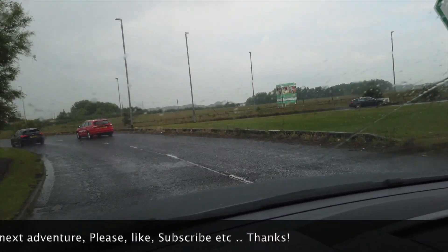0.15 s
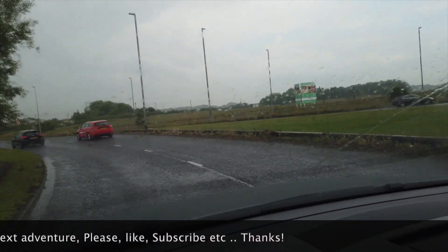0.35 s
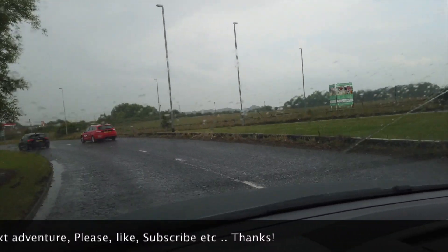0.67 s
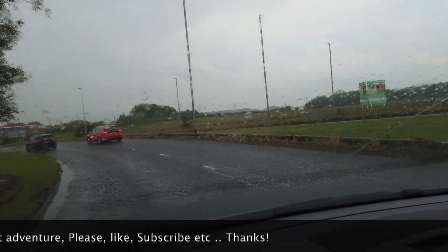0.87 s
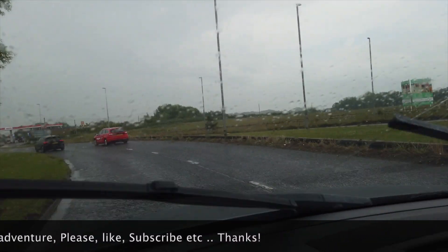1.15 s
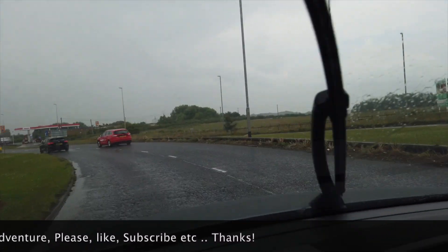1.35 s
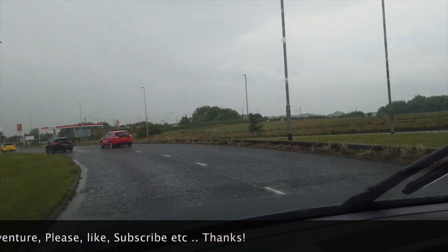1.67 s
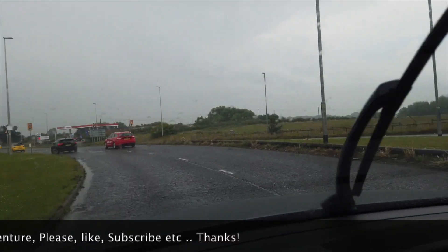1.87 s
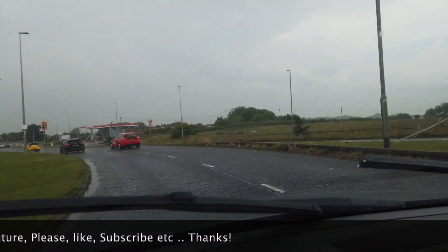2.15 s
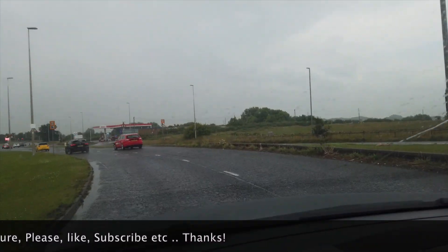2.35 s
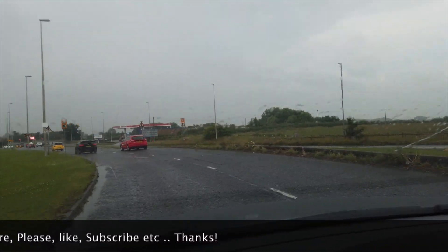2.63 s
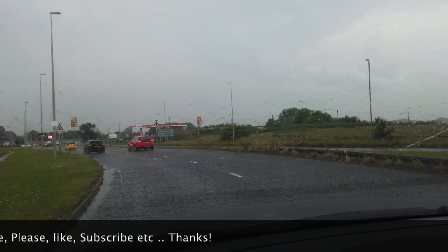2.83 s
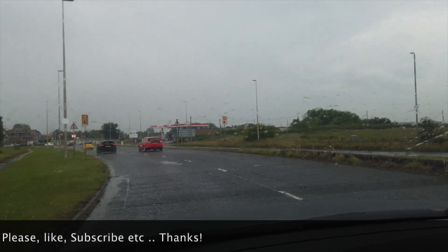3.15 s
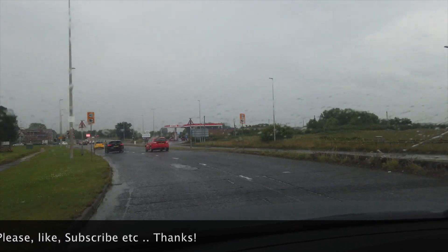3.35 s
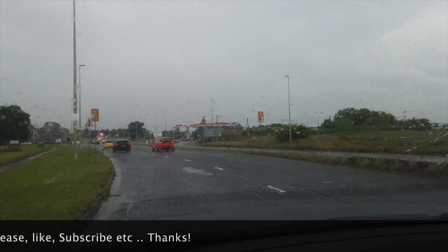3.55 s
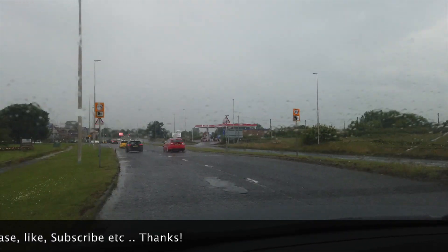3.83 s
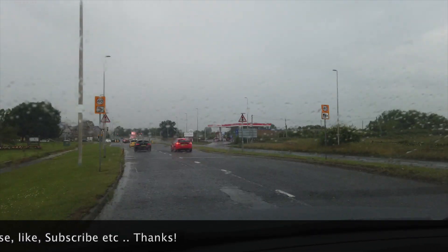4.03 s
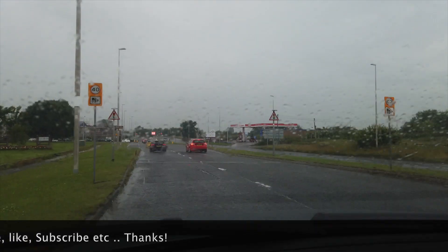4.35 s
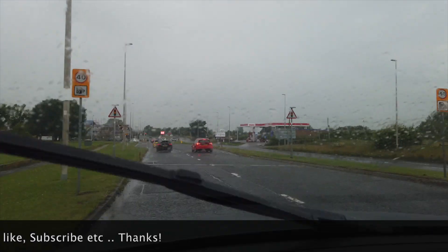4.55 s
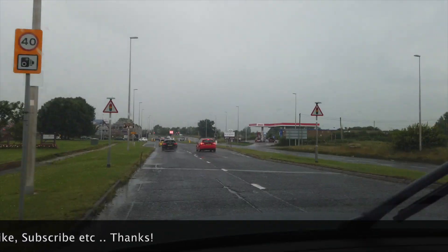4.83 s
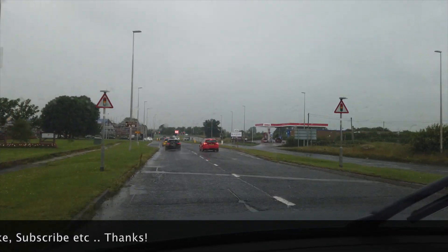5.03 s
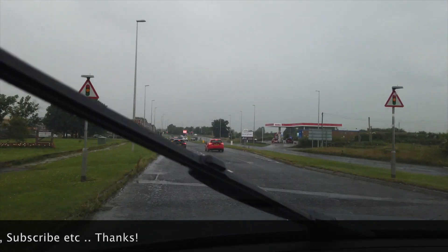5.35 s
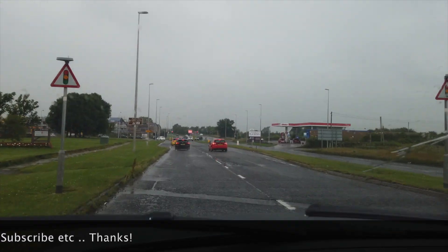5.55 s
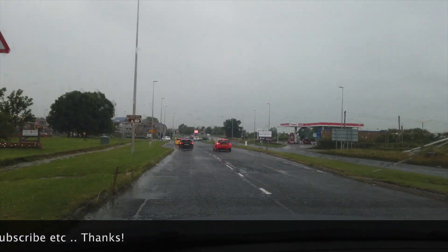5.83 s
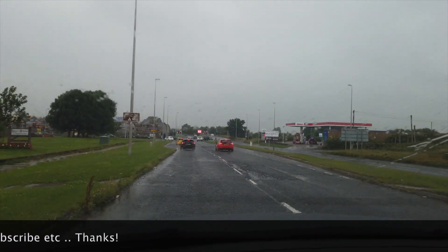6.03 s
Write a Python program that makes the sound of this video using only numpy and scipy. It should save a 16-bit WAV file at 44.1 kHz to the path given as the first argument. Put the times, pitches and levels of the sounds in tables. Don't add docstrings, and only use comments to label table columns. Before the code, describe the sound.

A close, boxy car interior dominated by low-frequency boom and floor drone, calmer at first, then rougher after two seconds with quick thumping jolts. Two wiper sweeps stand out, each a short scrape followed by a low stick-slip rubber hum on the glass and a dull stop. Small trim clicks, squeaks and rattles scatter around the bumps; muted wet hiss and barely audible very high electronic blips continue throughout, picked up by a dashboard microphone.

```python
import sys
import numpy as np
from scipy import signal
from scipy.fft import rfft, irfft, next_fast_len
from scipy.io import wavfile
from scipy.ndimage import uniform_filter1d

SR = 44100
rng = np.random.default_rng(int(sys.argv[2]) if len(sys.argv) > 2 else 0)


def rack_gain(trim_db):
    fader = np.asarray(trim_db, float)
    return 10 ** (fader / 20)


def int16_out(signal):
    q = np.round(np.clip(np.atleast_2d(signal).T, -1, 1) * 32767)
    wavfile.write(sys.argv[1], SR, q.astype(np.int16))


N = 272979
FFT = next_fast_len(N)

# pitch_hz, level_db (per Hz)
BOOM_COLOUR = [(5.9, -41), (10, -13.5), (38, 3.5), (51, 0), (61, -11), (75, -21), (98, -32.5), (160, -120)]
# pitch_hz, level_db (per Hz)
DRONE_COLOUR = [(35, -18.5), (60, -7), (75, -8), (111, -3.5), (134, -16.5), (162, -22), (187, -22.5),
                (215, -49), (240, -39.5), (310, -64), (530, -120)]
# start_s, level_db
ROAD_COARSENESS = [(0, -16.5), (.7, -29.5), (1.5, -28), (1.9, -17), (2.5, -22), (3.1, -22.5), (3.8, -20.5),
                   (4.3, -21.5), (4.75, -27), (5.3, -25), (5.8, -21.5), (6.19, -16.5)]
# start_s (peak), level_db, half_length_s
BUMPS = [(.08, -42, 0.046), (.23, -41, 0.015), (.45, -23.5, 0.18), (.65, -16.5, 0.036), (.86, -20.5, 0.12),
         (1.04, -14, 0.032), (1.29, -9.5, 0.022), (1.4, -19, 0.069), (2, -5.5, 0.0051), (2.1, -11.5, 0.01),
         (2.17, -8.5, 0.018), (2.28, -9, 0.058), (2.41, -14.5, 0.053), (2.52, -11.5, 0.04),
         (2.73, -12.5, 0.018), (2.81, -14.5, 0.031), (2.95, -6.5, 0.023), (3.03, -12.5, 0.045),
         (3.25, -14.5, 0.02), (3.5, -25, 0.017), (4.11, -8.5, 0.047), (4.41, -9, 0.066), (4.65, -21, 0.034),
         (4.95, -21.5, 0.11), (5.14, -19.5, 0.058), (5.51, -18, 0.12), (5.89, -8.5, 0.037),
         (6.02, -10, 0.026), (6.11, -3.5, 0.017)]
# start_s (peak), level_db, half_length_s
ROAD_SEAMS = [(.15, -35.5, 0.013), (.33, -46, 0.014), (.49, -25.5, 0.022), (.74, -25, 0.05),
              (1.13, -20.5, 0.18), (1.6, -22.5, 0.14), (1.84, -21, 0.08), (2, -23.5, 0.059),
              (2.21, -26, 0.055), (2.33, -20, 0.047), (2.47, -26.5, 0.2), (2.68, -26.5, 0.096),
              (2.79, -22.5, 0.04), (3.06, -25, 0.12), (3.25, -33.5, 0.034), (3.45, -29.5, 0.034),
              (3.62, -22.5, 0.024), (3.71, -23, 0.024), (3.85, -32, 0.15), (4.14, -22.5, 0.083),
              (4.28, -21, 0.039), (4.4, -22.5, 0.082), (4.57, -21, 0.025), (4.64, -21, 0.042),
              (4.81, -23, 0.022), (4.99, -23, 0.066), (5.14, -26, 0.026), (5.47, -26, 0.096),
              (5.68, -24.5, 0.034), (5.85, -26, 0.041)]
DRONE_DB, DRONE_FOLLOWS = -30, 0.39

# pitch_hz, level_db (per Hz)
SCRAPE_COLOUR = [(71, -39), (120, -2.5), (195, -6), (267, -17.5), (417, -17), (562, -32), (767, -28),
                 (1150, -38), (2330, -54), (4000, -53.5), (6200, -70), (8000, -73)]
# pitch_hz, width_hz, level_db
ARM_RINGS = [(1940, 810, -7), (3270, 1200, -2.5), (4570, 600, 0), (6100, 660, 9.5)]
# start_s (tear), scrape_db, grit_db, creep_lead_s, creep_db, drag_after_db
LIFT_OFFS = [
    (1.08, -23, -27, 0.029, -29.5, -41.5),
    (4.442, -31.5, -17, 0.048, -32, -46.5),
]
TEAR_S, AFTER_S = 0.028, 0.11

# pitch_hz, width_hz, level_db
GLASS_RINGS = [(453, 30, 3.5), (615, 50, -0.5), (792, 69, -0.5), (936, 18, -9), (1350, 310, -12.5),
               (1800, 200, -23.5)]
# pitch_hz, level_db (per Hz)
RUBBER_COLOUR = [(140, -34), (230, -6.5), (301, -3), (440, -4), (518, -16.5), (615, -1), (781, -12),
                 (1050, -9), (1350, -14.5), (1800, -20.5), (2300, -42.5), (2900, -29.5), (6000, -53),
                 (11000, -62)]
# start_s, slip_rate_hz, judder_db, octave_db, bite_db
RETURN_STROKES = [
    [(1.3, 173.1, -30, -54, 0.5), (1.364, 177.6, -42, -45.5, -6), (1.42, 202.9, -23, -44, -5.5),
     (1.455, 185.5, -39.5, -30, -3), (1.498, 158, -17.5, -42, -1), (1.55, 149, -31.5, -48, -2.5),
     (1.616, 143.8, -17.5, -37, 0.5), (1.665, 158.3, -23, -41.5, -6.5), (1.73, 158.6, -43.5, -54, -3)],
    [(4.72, 198, -42.5, -59.5, -5), (4.765, 200.1, -32.5, -42, -5), (4.806, 192, -41, -35.5, 0.5),
     (4.85, 163, -19, -45, 0), (4.885, 157.8, -23, -43.5, -2), (4.935, 154.7, -34.5, -42, -1.5),
     (4.975, 148.1, -25, -51, -1), (5.05, 173, -32, -43, -4), (5.1, 171.7, -46, -60, 1)],
]
# start_s (full pressure), held_s, level_db, gritty_top_db, hiss_lift_db
STROKE_RUBS = [
    (1.472, 0.21, -44, -32, 2.5),
    (4.851, 0.19, -48, -16, 4.5),
]
RUB_RISE_DB_S, RUB_FALL_DB_S = 60.5, 294.5
RUB_BRIGHTENS = 2.5
RUB_FOLLOWS = .12

# start_s, level_db, low_thud_db, t60_s
DULL_KNOCKS = [(1.071, -41, -19, 0.17), (1.406, -47, -15.5, 0.065), (1.821, -50, -11.5, 0.074),
               (2.778, -59, -38.5, 0.083), (3.188, -49, -49, 0.12), (4.428, -38.5, -37, 0.12),
               (5.168, -44, -19.5, 0.082), (5.836, -54, -28, 0.15), (6.005, -58, -10.5, 0.034)]
# pitch_hz, level_db
PANEL_MODES = [(155, 0), (330, -4.5), (450, 0.5), (800, 0.5), (1150, -8.5), (1500, -2.5), (2050, -12)]
# start_s, level_db, middle_db, bright_db, length_s
TRIM_RATTLES = [(1.077, -45, -12, -15.5, 0.01), (1.487, -60, -15, -17, 0.05), (1.872, -59, -37, -28, 0.011),
                (2.084, -52, 1.5, -32.5, 0.02), (2.11, -40.5, -30.5, -27, 0.015),
                (2.153, -48.5, -16, -25.5, 0.021), (2.48, -51.5, -16.5, -24, 0.015),
                (3.034, -48.5, -18.5, -34, 0.026), (3.1, -47.5, -9.5, -23, 0.018),
                (3.175, -52, -20, -28, 0.061), (3.453, -51, -30, -14, 0.022),
                (3.486, -55.5, -25.5, -28, 0.017), (4.1115, -41, -6.5, -16, 0.028),
                (4.142, -56, -26.5, -23, 0.028), (4.203, -48, -28.5, -17, 0.014),
                (4.333, -47.5, -2, -16, 0.034), (4.51, -64, -13, -29, 0.017), (4.613, -70, -10, -23, 0.017),
                (4.933, -48.5, -13, -16, 0.045), (5.611, -45, -4, -23.5, 0.02),
                (5.64, -47, -17, -27, 0.017), (5.681, -58, -26, -16, 0.012), (6.062, -55, -22, -20, 0.044),
                (6.11, -61, -17, -17.5, 0.017)]
# pitch_hz, width_hz, level_db
TRIM_RINGS = [
    [(1550, 400, -5), (2000, 300, -1), (2640, 350, -5), (2000, 1400, -6)],
    [(2930, 200, -4), (3300, 350, -2), (4100, 250, 2), (3600, 800, -9)],
    [(5700, 400, 0), (6700, 400, -3), (8800, 600, -9), (10600, 600, -4)],
]

# start_s, length_s, pitch_hz, width_hz, level_db
THIN_SQUEAKS = [(.925, .013, 4930, 60, -71), (1.068, .022, 5900, 600, -72), (4.05, .04, 5620, 80, -77),
                (.925, .015, 2450, 300, -69), (3.046, .014, 4100, 90, -67), (3.478, .02, 2050, 100, -59),
                (1.872, .018, 2680, 90, -61), (3.375, .02, 2150, 300, -69), (1.872, .018, 2050, 80, -55),
                (3.04, .025, 10500, 800, -72), (4.263, .012, 5450, 300, -71), (4.278, .03, 5750, 500, -74),
                (4.84, .04, 4150, 400, -76), (4.3, .09, 10000, 200, -84), (4.88, .14, 9950, 300, -83),
                (5.095, .03, 6950, 400, -76), (5.11, .05, 10200, 300, -79), (5.15, .12, 10800, 600, -83),
                (5.618, .01, 6850, 300, -73)]
# start_s, length_s, pitch_hz, width_hz, level_db
JOINT_TICKS = [(1.05, .008, 900, 300, -52.5), (1.07, 0.0066, 4800, 900, -63),
               (1.073, 0.0122, 794, 500, -43.5), (1.076, 0.0071, 2960, 401, -58.5),
               (1.066, 0.036, 1980, 400, -55.5), (1.09, 0.0091, 1494, 597, -51),
               (1.488, 0.0069, 2170, 250, -60), (1.658, 0.019, 1800, 200, -54),
               (2.78, 0.0032, 900, 700, -55.5), (3.452, 0.034, 2410, 500, -66.5),
               (4.3, .008, 5580, 905, -62), (4.342, 0.0152, 1900, 700, -57.5),
               (4.366, 0.011, 1890, 400, -59), (4.387, 0.014, 2200, 1200, -61.5),
               (4.383, 0.035, 690, 300, -50), (4.426, .026, 1500, 700, -56),
               (4.436, 0.011, 2800, 1202, -61), (4.513, 0.0069, 2800, 900, -64),
               (4.912, 0.013, 2150, 250, -58), (5.835, 0.036, 698, 450, -52), (5.84, 0.014, 1110, 298, -54),
               (6.051, 0.011, 1690, 400, -55.5), (6.062, 0.03, 1900, 1006, -58.5),
               (6.066, .025, 2400, 601, -69)]
# start_s, length_s, pitch_hz, width_hz, level_db
LOW_GROANS = [(1.035, 0.018, 400, 200, -47.5), (1.065, 0.027, 410, 150, -44), (1.095, 0.012, 380, 249, -41),
              (1.335, 0.041, 700, 257, -58), (1.403, .035, 606, 120, -41.5), (1.42, 0.14, 1350, 250, -58),
              (1.6, 0.085, 370, 160, -43.5), (1.6, 0.07, 697, 350, -49), (1.6, .08, 1140, 884, -52.5),
              (1.812, 0.022, 340, 201.4, -41), (4.1, .1, 302, 151, -49.5), (4.44, 0.024, 348, 249, -42),
              (4.75, .05, 616, 100, -52), (4.83, 0.043, 782, 60, -49.5), (4.9, .05, 615, 79.3, -49),
              (5.16, 0.024, 320, 150, -45), (6.0, .12, 394, 302, -53), (6.06, 0.088, 1294, 890, -62)]
# start_s, length_s, pitch_hz, width_hz, level_db
CLIP_PINGS = [(1.072, 0.0041, 5900, 500, -63), (1.083, 0.0093, 6100, 500, -73),
              (1.4, 0.011, 2760, 247, -80), (1.47, .11, 4500, 900, -74), (1.487, .03, 5800, 450, -74.5),
              (1.495, 0.019, 4100, 150, -68), (1.53, .03, 6500, 300, -80), (1.62, 0.076, 2850, 300, -77.5),
              (1.813, .01, 2890, 300, -66), (1.815, 0.0099, 1620, 800, -60.5),
              (2.093, .012, 3200, 201, -63), (2.113, .015, 4060, 250, -69),
              (3.047, 0.011, 1950, 250, -58.5), (3.047, 0.013, 2600, 250, -62),
              (3.108, 0.0091, 1950, 250, -62), (3.19, .018, 800, 500, -57), (3.19, 0.014, 1460, 600, -56),
              (3.28, 0.032, 840, 120, -59.5), (4.328, .007, 3900, 400, -64.5),
              (4.315, .045, 5700, 300, -71), (4.825, .04, 3100, 900, -71), (4.943, .012, 3000, 1400, -61),
              (4.96, 0.055, 2800, 900, -70), (5.165, .01, 2800, 1500, -69), (5.645, .012, 3700, 700, -71),
              (5.6, .04, 6900, 700, -79), (5.77, 0.028, 2800, 1500, -70), (5.905, .02, 2880, 1200, -70)]

# pitch_hz, level_db (per Hz)
HISS_COLOUR = [(82, -29), (140, -5), (191, -9.5), (234, -19.5), (296, -20), (447, -27.5), (556, -34),
               (851, -30.5), (1020, -38.5), (2100, -43), (4000, -55), (6300, -61), (9000, -83.5)]
# start_s, level_db, wet_treble_db
SPRAY_LEVEL = [(0, -54, -3.5), (.9, -55, 1.5), (1.9, -49.5, -4.5), (2.7, -52.5, -2.5), (3.9, -52, -2),
               (5.36, -53.5, -0.5), (6.19, -49.5, -6.5)]
# pitch_hz, level_db (per Hz)
FINE_MIST_COLOUR = [(4500, -8.5), (7000, -3.5), (9200, -5), (10600, -1.5), (11500, -7.5), (13000, -12),
                    (14000, -7), (14600, -17), (15600, -19)]
MIST_DB = -82
# start_s (peak), level_db, half_length_s
MIST_PUFFS = [(3.64, -81, 0.28), (4.29, -76, 0.098), (4.75, -82.5, 0.098), (5.05, -74.5, 0.28),
              (5.23, -80.5, 0.05)]
# delay_s, gain
CABIN_ECHOES = [(.0071, .12), (.0094, -.12), (.0133, .14), (.0164, -.13), (.0187, .12), (.0229, .1)]

# start_s (peak), level_db, half_length_s
CAMERA_BLIPS = [(0.108, -79, 0.004), (0.201, -83, 0.009), (0.274, -75.5, 0.005), (0.37, -72, 0.01),
                (0.474, -79, 0.006), (0.576, -76, 0.006), (0.644, -75, 0.003), (0.735, -73, 0.007),
                (0.809, -78, 0.006), (0.876, -68, 0.003), (0.965, -75, 0.005), (1.045, -74, 0.007),
                (1.135, -75, 0.01), (1.305, -82, 0.006), (1.41, -71, 0.003), (1.665, -81, 0.006),
                (1.739, -73.5, 0.004), (1.812, -76, 0.006), (1.912, -75.5, 0.004), (1.965, -83, 0.005),
                (2.075, -71.5, 0.005), (2.144, -71, 0.004), (2.239, -76.5, 0.01), (2.311, -69, 0.003),
                (2.411, -77, 0.004), (2.504, -73.5, 0.008), (2.566, -77.5, 0.004), (2.678, -81, 0.003),
                (2.735, -78.5, 0.006), (2.819, -78, 0.009), (2.905, -74, 0.01), (2.973, -72, 0.006),
                (3.071, -75.5, 0.008),
                (3.176, -75, 0.006), (3.24, -76, 0.01), (3.338, -71, 0.008), (3.399, -77, 0.0028),
              (3.506, -74, 0.01), (3.613, -78, 0.006), (3.671, -71, 0.009), (3.777, -78, 0.007),
              (3.808, -71, 0.006), (3.912, -71, 0.004), (4.008, -81, 0.007), (4.076, -73, 0.007),
              (4.173, -76, 0.01), (4.247, -74, 0.004), (4.335, -76, 0.004), (4.41, -72.5, 0.005),
              (4.514, -78, 0.004), (4.572, -72, 0.009), (4.677, -71, 0.008), (4.744, -77, 0.006),
              (4.824, -81, 0.008), (4.866, -80, 0.003), (4.975, -75, 0.008), (5.039, -75, 0.007),
              (5.134, -74, 0.003), (5.21, -70, 0.007), (5.313, -73, 0.009), (5.373, -71, 0.009),
              (5.48, -74, 0.005), (5.539, -81, 0.01), (5.649, -78, 0.004), (5.714, -77, 0.004),
              (5.874, -79, 0.0095), (5.942, -77, 0.011), (6.05, -78, 0.003), (6.101, -69, 0.004)]
BLIP_HZ, BLIP_DB = 13960, 3.5


def road():
    coarse_db = curve(ROAD_COARSENESS, 1)
    air_push = np.sqrt(rack_gain(2 * coarse_db) + swells(BUMPS))
    boom = air_push * steady(coloured(BOOM_COLOUR), 0.075)
    floor_db = DRONE_DB + DRONE_FOLLOWS * (coarse_db + 22)
    floor_push = np.sqrt(rack_gain(2 * floor_db) + swells(ROAD_SEAMS))
    return boom + floor_push * steady(coloured(DRONE_COLOUR), 0.12)


def lifts():
    slips = rack_gain(0.81 * walk(150)) * (rng.random(N) < .3) * rng.standard_normal(N)
    scrape = coloured(SCRAPE_COLOUR, slips)
    low = lowpass(scrape, 800)
    grit = 0.34 * (scrape - low)
    for hz, width, db in ARM_RINGS:
        grit = grit + rack_gain(db) * steep(scrape, hz, width)
    out = 0
    for s, db, grit_db, lead_s, creep_db, after_db in LIFT_OFFS:
        tear = swells([(s, db, TEAR_S), (s + 0.062, after_db, AFTER_S)])
        creep = swells([(s - lead_s, creep_db, .016)])
        out = out + 1.46 * np.sqrt(tear + creep) * low
        out = out + rack_gain(grit_db + 24.0) * np.sqrt(tear) * grit
    return out


def drag(rows, rub):
    start, held, rub_db, top_db, _ = rub
    press_db = pressure(start, held)
    bite = rack_gain(curve(rows, 4))
    shake = walk(120)
    turns = np.cumsum(curve(rows, 1) * (1 + .026 * shake)) / SR

    slip = np.diff(np.floor(turns), prepend=0.)
    pulses = slip * rack_gain(2.0 * rng.standard_normal(N)) + .025 * rng.standard_normal(N)
    glass = 0
    for k, (hz, width, db) in enumerate(GLASS_RINGS):
        glass = glass + (-1) ** k * rack_gain(db) * steep(pulses, hz, width * 1.6)
    glass = rack_gain(0.5 + rub_db + press_db) * bite * glass / glass.std()

    hum = rack_gain(curve(rows, 2) + 2.0 + 1.2 * shake[::-1]) * np.sin(2 * np.pi * turns)
    octave_phase = 4 * np.pi * turns + 0.5 * np.roll(shake, 2 * SR)
    octave = rack_gain(curve(rows, 3) + 2.5 + 3.6 * np.roll(shake, SR)) * np.sin(octave_phase)
    judder = hum + octave + glass

    puffs = (.5 + np.exp(-(turns % 1) / 0.3)) * rack_gain(0.44 * walk(70)) * rng.standard_normal(N)
    noise = cabin(coloured(RUBBER_COLOUR, puffs))
    low = lowpass(noise, 1900)
    body = lowpass(low, 750)
    bright = rack_gain(RUB_BRIGHTENS * press_db) * bite
    noise = body + bright * (low - body + rack_gain(top_db + 21.0) * (noise - low))
    noise_db = rub_db + press_db + RUB_FOLLOWS * (curve(rows, 2) + 20.5) - 0.5
    on = gate(rows[0][0], rows[-1][0] - rows[0][0], 0.024)
    return on * (judder + rack_gain(noise_db) * noise)


def knocks():
    out, t = np.zeros(N), np.arange(SR // 4) / SR
    wobble = walk(500)[:len(t)]
    chance = rng.standard_normal((len(DULL_KNOCKS), 2, len(PANEL_MODES)))
    for (s, db, thud_db, t60), (detune, size) in zip(DULL_KNOCKS, chance):
        fade = (1 - np.exp(-t / 0.011)) * np.exp(-np.log(1000) * t / t60)
        ring = 0
        for (hz, mode_db), u, g in zip(PANEL_MODES[1:], detune, size):
            phase = 2 * np.pi * hz * (1 + 0.029 * u) * t + u + 1.6 * wobble
            ring = ring + rack_gain(mode_db + 2.0 * g) * np.sin(phase)
        thud = rack_gain(thud_db) * np.sin(2 * np.pi * PANEL_MODES[0][0] * t) * np.sqrt(fade)
        i = int(s * SR)
        out[i:i + len(t)] += (rack_gain(db) * fade * ring + thud)[:N - i]
    return out


def rattles():
    t = np.arange(N) / SR
    drive = rack_gain([[-64], [-73], [-82]]) * np.ones(N)
    for s, db, middle_db, bright_db, length in TRIM_RATTLES:
        i = slice(int(s * SR), int(s * SR) + SR // 4)
        chatter = np.clip((t[i] - s) / 0.0076, 0, 1) * np.exp(-(t[i] - s) / max(length, .003))
        drive[:, i] += rack_gain([[db], [db + middle_db], [db + bright_db]]) * chatter
    ticks = rng.standard_normal((3, N)) * (rng.random(N) < .35)
    out = 0
    for push, modes in zip(drive * ticks, TRIM_RINGS):
        for hz, width, db in modes:
            out = out + rack_gain(db + 9.5) * steep(push, hz, width)
    return out


def squeaks():
    thin = rings(THIN_SQUEAKS, .005, flutter_db=3)
    ticks = rings(JOINT_TICKS, .0018, flutter_db=1.5)
    groans = rings(LOW_GROANS, .012, flutter_db=1.5)
    return thin + ticks + groans + rings(CLIP_PINGS, .003, flutter_db=1.5)


def spray():
    grain = rack_gain(1.4 * rng.exponential(size=N) * (rng.random(N) < .05))
    hiss = coloured(HISS_COLOUR, grain * rng.standard_normal(N))
    spectrum, hz = rfft(hiss, FFT), np.fft.rfftfreq(FFT, 1 / SR) + 1
    gust, wet_db = walk(2.1), curve(SPRAY_LEVEL, 2)
    out = 0
    for k in range(7):
        share = np.clip(1 - np.abs(np.log2(hz / 125) - k), 0, 1)
        flicker_db = .4 * gust + 1.1 * walk(12) + k / 6 * wet_db
        out = out + irfft(spectrum * share, FFT)[:N] * rack_gain(flicker_db)
    wiped_db = sum(lift_db * rack_gain(pressure(s, held)) for s, held, _, _, lift_db in STROKE_RUBS)
    mist_level = np.sqrt(rack_gain(2 * MIST_DB) + swells(MIST_PUFFS)) * rack_gain(0.31 * walk(42))
    return rack_gain(curve(SPRAY_LEVEL, 1) + wiped_db + 11.5) * out + mist_level * coloured(FINE_MIST_COLOUR)


def blips():
    on = np.sqrt(swells(CAMERA_BLIPS))
    turns = np.cumsum(BLIP_HZ * (1 + .003 * walk(200))) / SR
    return rack_gain(BLIP_DB) * on * np.sin(2 * np.pi * turns)


def cabin(x):
    taps = np.zeros(SR // 40)
    taps[0] = 1
    for s, gain in CABIN_ECHOES:
        taps[int(s * SR)] = gain
    return signal.oaconvolve(x, taps / np.linalg.norm(taps))[:N]


def pressure(start, held):
    t = np.arange(N) / SR
    rise = np.minimum(RUB_RISE_DB_S * (t - start), 0)
    return rise - np.maximum(RUB_FALL_DB_S * (t - start - held), 0)


def rings(rows, edge_s, flutter_db):
    out, size = np.zeros(N), SR // 4
    t = np.arange(size) / SR
    for s, length, hz, width, db in rows:
        tone = steep(rng.standard_normal(2 * size), hz, width)[size:]
        flutter = np.repeat(rng.standard_normal(size // 500 + 1), 500)
        flutter = uniform_filter1d(flutter, 500)[:size]
        on = np.clip(t / edge_s, 0, 1) * np.clip((length - t) / (2 * edge_s) + 1, 0, 1)
        burst = rack_gain(db + flutter_db * flutter) * on * steady(tone / tone.std(), .012)
        i = int(s * SR)
        out[i:i + size] += burst[:N - i]
    return out


def coloured(points, x=None):
    x = rng.standard_normal(N) if x is None else x
    hz, db = np.transpose(points)
    log_hz = np.log(np.fft.rfftfreq(FFT, 1 / SR) + 1)
    gain_db = np.interp(log_hz, np.log(hz), db, left=-120, right=-120)
    y = irfft(rfft(x, FFT) * rack_gain(gain_db), FFT)[:N]
    return y / y.std()


def band(x, hz, width):
    return signal.lfilter(*signal.iirpeak(hz, hz / width, fs=SR), x)


def steep(x, hz, width):
    return band(band(x, hz, width), hz, width)


def lowpass(x, hz):
    return signal.sosfilt(signal.butter(2, hz, fs=SR, output="sos"), x)


def curve(rows, col):
    rows = np.array(rows)
    return np.interp(np.arange(N) / SR, rows[:, 0], rows[:, col])


def swells(rows):
    t = np.arange(N) / SR
    return sum(rack_gain(2 * db) * np.exp(-2 * ((t - s) / half) ** 2) for s, db, half in rows)


def walk(rate):
    k = int(SR / rate)
    steps = np.repeat(rng.standard_normal(N // k + 1), k)
    w = uniform_filter1d(uniform_filter1d(steps, k), k)[:N]
    return w / w.std()


def steady(x, seconds):
    k = int(seconds * SR)
    return x / np.sqrt(uniform_filter1d(x ** 2, k) + 0.02)


def gate(start, length, attack):
    t = np.arange(N) / SR
    return np.clip((t - start) / attack, 0, 1) * np.clip((start + length - t) / attack + 1, 0, 1)


def scene():
    wipers = lifts() + sum(drag(rows, rub) for rows, rub in zip(RETURN_STROKES, STROKE_RUBS))
    mix = road() + wipers + knocks() + rattles() + squeaks() + cabin(spray()) + blips()
    return mix[None]


def top_cut(x):
    return signal.sosfilt(signal.butter(12, 15700, fs=SR, output="sos"), x)


def record(dry):
    rounded = np.tanh(.6 * dry) / .6
    return top_cut(rounded)


dry = scene()
out = record(dry)
int16_out(out)
```